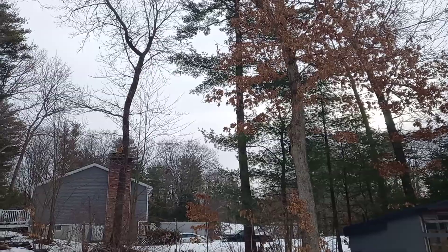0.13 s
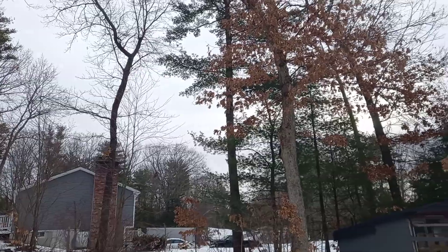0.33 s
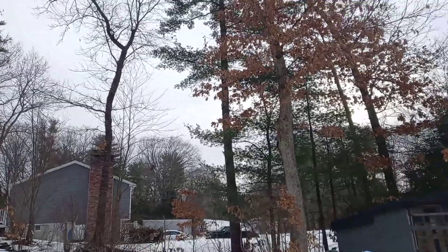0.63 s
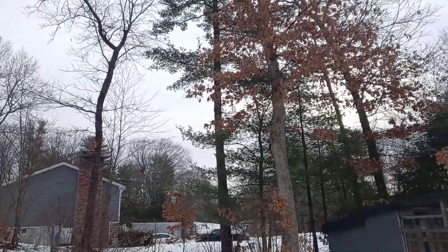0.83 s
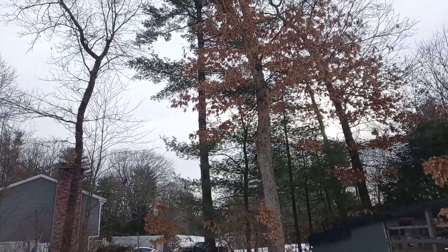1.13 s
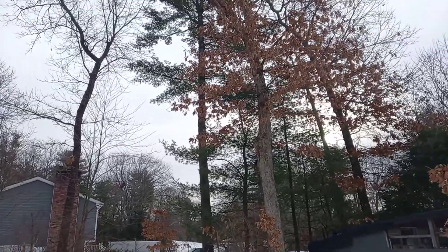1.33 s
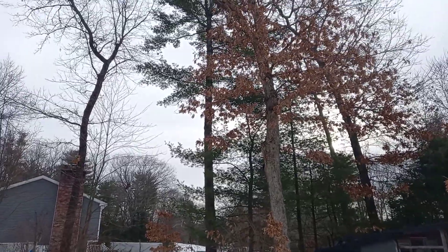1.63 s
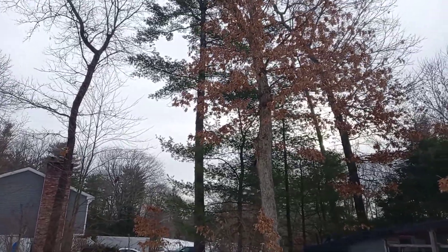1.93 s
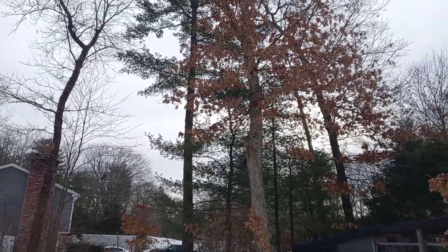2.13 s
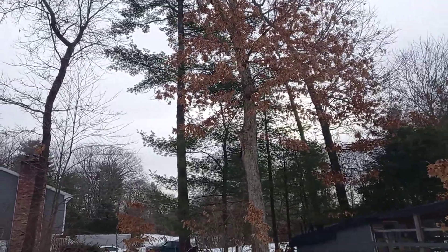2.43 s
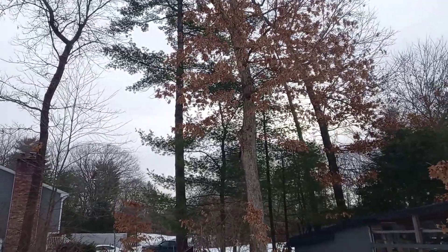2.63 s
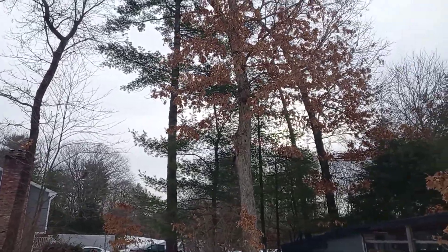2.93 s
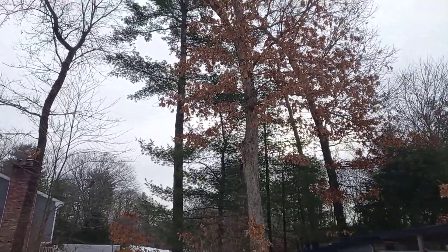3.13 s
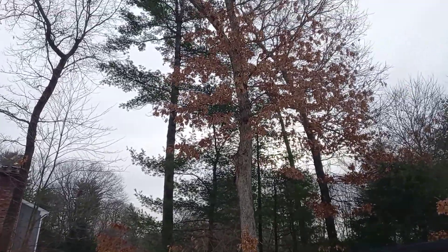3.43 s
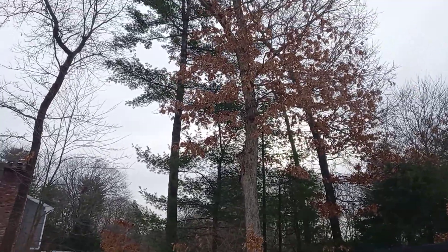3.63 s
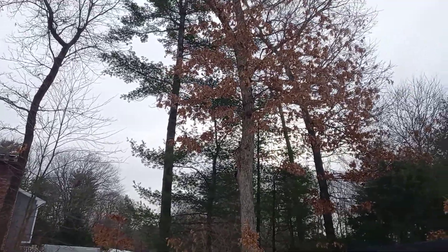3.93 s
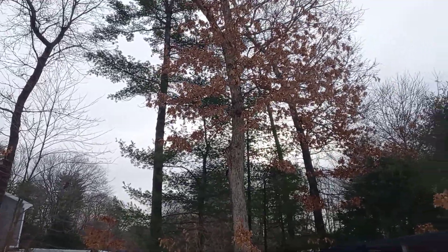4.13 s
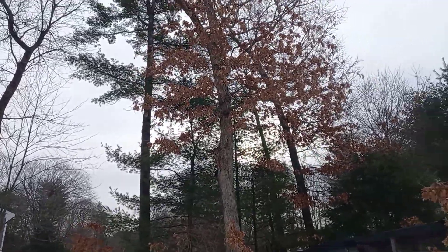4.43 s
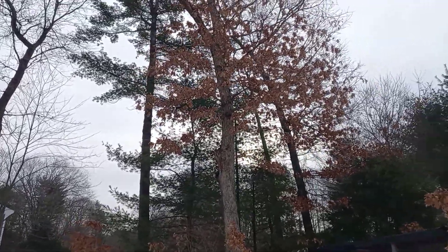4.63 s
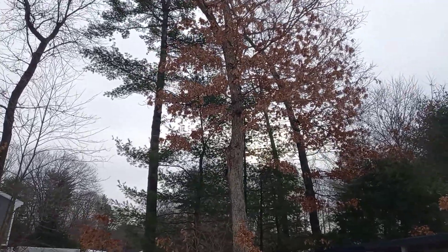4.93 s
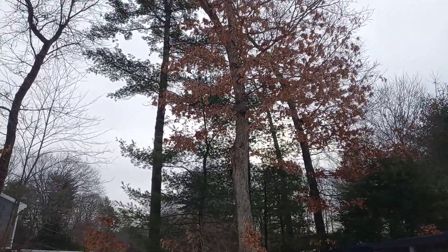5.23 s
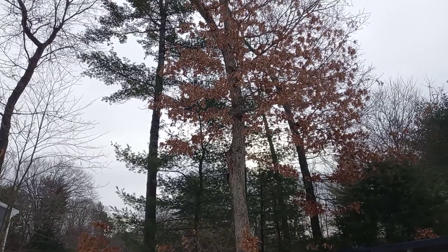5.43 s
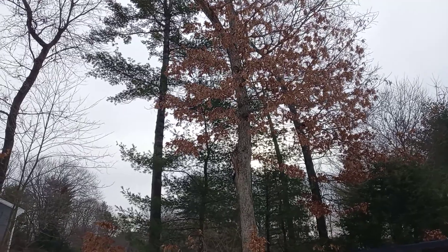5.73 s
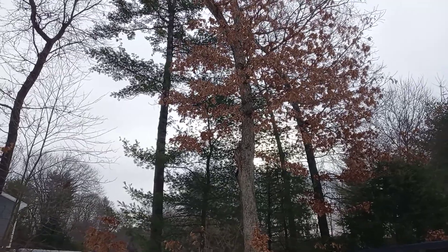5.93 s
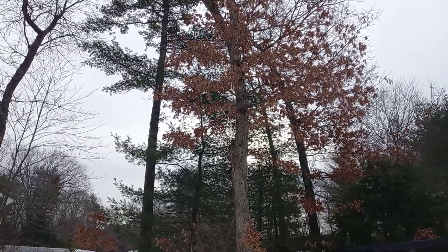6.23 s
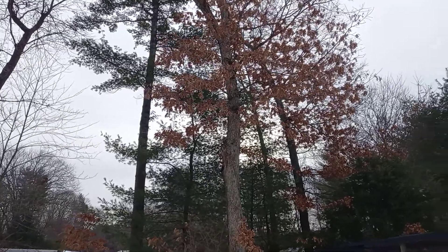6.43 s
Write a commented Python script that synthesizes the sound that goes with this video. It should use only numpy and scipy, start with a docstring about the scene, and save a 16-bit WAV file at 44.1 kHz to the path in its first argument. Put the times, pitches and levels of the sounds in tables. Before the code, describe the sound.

In a wooded yard, distant songbirds trade rising whistles and falling slurs over a hollow low drone that swells and sinks in gusts. A woodpecker gives a few sharp knocks on a trunk, pauses, then raps a longer, louder run of quick blows. Nearer whistles join toward the end with a slight echo. The sound is in stereo, with a soft hiss of open air underneath.

```python
"""A snowy yard between houses and trees, heard through a stereo pair of microphones.
A woodpecker raps on wood in two quick runs, about seven blows a second: the bill cracks, the trunk rings.
Songbirds trade rising whistles and falling slurs, far off at first, then nearer, echoing from the houses
and through the wood. Underneath, a hollow low drone swells and sinks in gusts, taking a distant rumble
and a faint hum with it; the open air hisses and dry oak leaves stir."""
import sys
import numpy as np
from scipy import signal
from scipy.fft import rfft, irfft
from scipy.io import wavfile

SR = 44100
rng = np.random.default_rng(int(sys.argv[2]) if len(sys.argv) > 2 else 0)


def int16_out(signal):
    """Quantize to a 16-bit WAV file."""
    q = np.round(np.clip(np.atleast_2d(signal).T, -1, 1) * 32767)
    wavfile.write(sys.argv[1], SR, q.astype(np.int16))


N = 290178
T = np.arange(N) / SR
GUST_MEAN_DB = -52

# Table levels are relative; pan_db is left minus right.
# spectra of the open air, dry leaves, distant rumble, drone and its upper edge: frequency_hz, level_db
HISS_SPECTRUM = [(200, 12), (700, 19), (1100, 16), (1700, 18), (2600, 10.5), (3400, 9.5), (5000, 2.5),
                 (6800, 1), (8000, -2), (9500, -3.5), (12000, 3.5), (16000, -19.5)]
LEAF_SPECTRUM = [(2500, -4), (5200, -14.5), (6700, -4), (7900, -11), (9400, -9.5), (11500, -21),
                 (16000, -20.5)]
RUMBLE_SPECTRUM = [(20, -28.5), (40, -8.5), (62, 4.5), (85, 4), (140, 1.5), (190, 4), (250, 7.5), (400, -9),
                   (800, -37.5)]
DRONE_SPECTRUM = [(150, -43.5), (220, -13.5), (290, -4.5), (350, 1.5), (420, 1.5), (470, -6), (525, -11),
                  (580, -23.5), (700, -31.5), (1000, -50), (2000, -66.5)]
EDGE_SPECTRUM = [(380, -31.5), (500, -1), (530, 1), (570, -7), (620, -7), (700, -14), (900, -28),
                 (1500, -50)]
# strength of the leaves' stir, the gusts and the drone's upper edge: time_s, level_db
LEAF_LEVELS = [(.3, -100), (.5, -81), (.62, -90), (.8, -80), (1.1, -81), (1.28, -84.5), (1.38, -73),
               (1.48, -90), (1.65, -78.5), (1.9, -100), (2.5, -105)]
GUST_LEVELS = [(0.11, -68), (0.49, -60), (0.52, -53), (0.58, -64), (0.78, -62), (0.97, -40.5), (1.05, -48),
               (1.19, -47), (1.46, -61.5), (1.57, -48.5), (1.69, -52), (1.75, -65), (1.78, -56),
               (2.06, -42.5), (2.13, -51.5), (2.16, -45.5), (2.25, -56), (2.67, -49), (2.76, -59.5),
               (2.97, -47), (3.03, -58), (3.33, -61), (3.37, -52), (3.44, -59.5), (3.48, -53), (3.88, -56),
               (4.02, -50), (4.25, -59), (4.29, -51.5), (4.78, -52), (4.96, -39.5), (5.05, -51.5),
               (5.08, -45), (5.14, -58), (5.19, -44.5), (5.24, -54), (5.28, -46), (5.5, -48), (5.53, -54),
               (5.82, -44), (5.98, -58), (6.04, -50), (6.13, -55), (6.45, -48), (6.51, -42), (6.58, -47)]
EDGE_LEVELS = [(0.11, -94), (0.49, -74.5), (0.76, -88), (0.96, -65), (1.08, -71.5), (4.25, -74),
               (4.51, -61), (4.69, -67.5), (4.96, -51.5), (5.14, -65.5), (5.34, -57.5), (6.33, -72.5),
               (6.47, -63), (6.58, -63)]
# tones of the hum: pitch_hz, level_db
HUM_TONES = [(104.2, -77), (209, -72)]
# centre of the drone at mean gust strength: time_s, pitch_hz
DRONE_CENTRE = [(.1, 356.4), (.85, 374.8), (1.15, 344), (2.0, 346.9), (2.55, 370.4), (2.95, 342.8),
                (3.6, 389.4), (4.6, 387.4), (4.95, 368.3), (5.6, 383), (6.58, 375)]

# pitch shapes of the bird notes, scaled by each note's pitch_ratio: share_of_note, pitch_hz
WHISTLE_SHAPE = [(0, 2760), (.33, 2780), (.45, 3055), (.65, 3161), (1, 3230)]
LOW_SLUR_SHAPE = [(0, 2500), (.35, 2230), (.6, 2007), (1, 1942)]
UPSLUR_SHAPE = [(0, 2550), (.35, 3476), (.65, 3980), (1, 4035)]
DOWNSLUR_SHAPE = [(0, 4130), (.2, 4030), (.7, 3180), (1, 3080)]
PEEP_SHAPE = [(0, 6260), (.5, 7350), (1, 6550)]
SWEEP_SHAPE = [(0, 4450), (.5, 5400), (1, 6440)]
BLIP_SHAPE = [(0, 682), (1, 702)]
RASP_SHAPE = [(0, 3630), (.4, 4006), (1, 3950)]
# high rising and falling notes, thin peeps, a clean upward sweep and a faint low blip:
# start_s, length_s, level_db, pan_db, pitch_ratio, buzz_amount
UPSLUR_NOTES = [(0.21, .1, -77.5, 5, 0.98, 0.32), (0.281, 0.08, -78.5, 6, 0.95, .6),
                (0.406, 0.084, -80.5, 3, 0.97, .45), (0.597, 0.19, -78.5, 6, 1, 0.3),
                (0.672, .14, -80.5, 7, 1.02, .4), (.865, .079, -81.5, 2.5, 1.12, 0.6),
                (1.288, 0.11, -79, 5, 1.02, 0.6), (1.534, 0.15, -75.5, 5, .99, 0.13),
                (1.888, 0.075, -80.5, 4, 0.88, 0.8)]
DOWNSLUR_NOTES = [(0.786, 0.021, -76, 0, .97, 0.13), (.94, .065, -74, 3, 0.86, .2),
                  (2.402, .097, -88, 12, 0.89, 0.35), (5.856, 0.02, -68, -0.5, 0.84, 0.2),
                  (6.229, .026, -58.5, 7.5, 1, 0.5)]
PEEP_NOTES = [(4.042, 0.058, -83, -15, 0.97, .3), (4.123, 0.059, -86, -17, 0.93, 1),
              (4.482, 0.022, -70, -4, .97, 0.7)]
SWEEP_NOTES = [(0.546, .058, -83.5, -7, 1, 0)]
BLIP_NOTES = [(3.135, .045, -71.5, 9, 1, 0.26)]
# rising whistles that lead the song, and low falling slurs between them:
# start_s, length_s, level_db, pan_db, pitch_ratio, buzz_amount, crescendo_db
WHISTLE_NOTES = [(0.67, 0.16, -69, 1, 1.005, 0.24, 19), (1.058, .19, -70, 1, 1.02, .4, 11),
                 (1.467, 0.15, -68, 3, 1.01, .45, 14.5), (1.925, 0.19, -68.5, 0.5, 1, .5, 11),
                 (2.47, .25, -91, 5, 1.03, .5, 8), (5.632, 0.17, -64, 15, 1, 0, 22.5),
                 (5.998, 0.19, -63, 11, 0.99, 0.18, 23), (6.39, 0.21, -59.5, 8.5, 0.99, 0.3, 15)]
LOW_SLUR_NOTES = [(0.514, 0.082, -82.5, -2, 1.01, .1, -2), (0.919, 0.065, -75, -7.5, 1.02, .1, 4),
                  (1.326, 0.088, -73, -8.5, .99, 0.02, 3), (1.807, 0.078, -69.5, -7, .98, .1, 11),
                  (2.394, .045, -76.5, -9, 0.9, 0.1, 4), (2.784, 0.02, -71.5, -4, .9, .1, 9),
                  (5.884, .07, -69.5, -8, 1.03, 0, -12), (6.265, .075, -66, -4.5, 1.005, 0.3, -15.5)]
# hoarse calls: start_s, length_s, level_db, pan_db, pitch_ratio, buzz_amount, crescendo_db, fall_hz
RASP_NOTES = [(2.325, 0.088, -74.5, 0, 1.07, .9, 1.5, 1100), (2.712, 0.15, -69, 5.5, 1.0, 0.73, 6, -200)]
# echoes of the birds off the houses, and of the blows off the walls: delay_s, left_db, right_db
HOUSE_ECHOES = [(.017, -18, -16), (.031, -16, -19)]
WALL_ECHOES = [(.0018, 3.5, -10.5), (.0043, 2.5, -8), (0.0167, 0.5, -6), (0.056, -24.5, -22)]

# blows of the bill, each with three rings of the struck spot: start_s, level_db, knock_db, pan_db,
# hardness_db, ring1_hz, ring2_hz, ring3_hz, ring1_db, ring2_db, ring3_db
BILL_BLOWS = [(2.1963, -83.5, 13.5, -8, 8, 1310, 1920, 3200, 12, 4, -9),
              (2.6913, -49, -11, 9.5, -17, 1200, 1750, 3520, 2, 2, 6),
              (2.8192, -44, -6, 8, -7.5, 1000, 1750, 3540, 2, 3.5, 8.5),
              (2.946, -35.5, -9.5, 5.5, -5, 1050, 1610, 2750, 4, 1.5, -3),
              (3.2187, -43.5, -10, 3, -11.5, 980, 1740, 2800, 4, 2, -5.5),
              (4.187, -81.5, 7, -12, 9.5, 1320, 1690, 2750, 2, 5, -14),
              (4.29, -51, -6, -3, -23, 1180, 2140, 3360, -3, -3.5, -4),
              (4.414, -47, -12.5, 0, -30, 1300, 2420, 2600, 6, 4, 0),
              (4.54, -47.5, -8, 1, -20, 1140, 1540, 2750, 8, -3, 2),
              (4.675, -51, -4, -3, -12, 1120, 1890, 2800, 9, 6, -6),
              (4.7897, -42, -11, 3, -38, 1360, 1800, 2800, -4, 0, -1),
              (4.921, -35.5, -9.5, 6.5, -10, 1130, 1920, 2800, 0, -7.5, -1),
              (5.043, -31, -9.5, 1.5, 0.5, 970, 2070, 2640, 5.5, -4.5, 0.5),
              (5.1705, -31.5, -8, 5, 0, 975, 2060, 2520, 9.5, 0.5, -1),
              (5.3001, -32, -9, 2, 0.5, 1000, 1910, 1460, 0.5, -4.5, -3.5),
              (5.424, -33, -4, 4.5, -4.5, 1150, 1900, 2320, 3.5, -7.5, -5),
              (5.5654, -33, -4.5, 5, -4, 1100, 2200, 2550, 9.5, 7, 6),
              (5.717, -29, -9, 5, 0.5, 1170, 2240, 3210, -6.5, -0.5, -1),
              (5.872, -36, -6, 9, -5.5, 1040, 2240, 2930, -6, -3.5, 0),
              (6.0291, -41.5, -16.5, 6.5, -1, 1120, 2060, 2900, -10, 3, 2),
              (6.195, -42.5, -9.5, 3.5, -7, 884, 2080, 3220, -2, -3, 11.5)]
# modes of the trunk: pitch_hz, level_db, t60_s
TRUNK_MODES = [(400, 1, 0.021), (577, 3.5, 0.0037), (645, 2.5, 0.0097), (1450, -10.5, 0.024),
               (2446, 5, 0.0073), (4500, 12.5, 0.0044)]
# three rings of the spot right under the bill: level_db, t60_s
SPOT_RINGS = [(-0.5, 0.0098), (3, 0.006), (-2, 0.008)]
# crack of the bill at the left and right microphone: frequency_hz, level_db
LEFT_CRACK_SPECTRUM = [(300, -5), (1400, -19.5), (2500, -4), (4000, -2.5), (5200, -6), (6500, 0.5),
                       (8000, 0.5), (9400, 5.5), (11000, -3), (13500, -1.5), (16000, -14)]
RIGHT_CRACK_SPECTRUM = [(300, 9), (1400, 6.5), (2500, -3), (4000, -10.5), (5200, 9), (6500, 7.5),
                        (7500, 13), (8800, -7), (11000, 6), (13500, 1.5), (16000, -13)]


def from_db(db):
    """Decibels to gain."""
    return 10 ** (np.asarray(db) / 20)


def stereo_gain(left_db, right_db):
    """A gain for each microphone."""
    return from_db([[left_db], [right_db]])


def unit_rms(x):
    """Scale to unit rms."""
    return x / np.sqrt(np.mean(x ** 2) + 1e-20)


def unit_energy(x):
    """Scale each channel to unit energy."""
    return x / np.sqrt(np.sum(x ** 2, axis=-1, keepdims=True) + 1e-20)


def in_time(rows):
    """A curve table's value at every sample."""
    return np.interp(T, *np.transpose(rows))


def add(track, start_s, sound):
    """Mix a sound into a track from a given time on."""
    i = max(round(start_s * SR), 0)
    piece = sound[..., :max(track.shape[-1] - i, 0)]
    track[..., i:i + piece.shape[-1]] += piece


def colour(x, spectrum, size=4096):
    """Minimum-phase filter of unit energy that follows a spectrum."""
    hz, db = np.transpose(spectrum)
    grid_hz = np.maximum(np.arange(size // 2 + 1) * SR / size, 1)
    gain = from_db(np.interp(np.log(grid_hz), np.log(hz), db))
    cepstrum = irfft(np.log(gain))
    cepstrum[1:size // 2] *= 2
    cepstrum[size // 2 + 1:] = 0
    response = unit_energy(irfft(np.exp(rfft(cepstrum))))
    return signal.oaconvolve(np.atleast_2d(x), response[None])[:, :N]


def stereo_noise(spectrum, alike):
    """Coloured noise with a given left-right correlation."""
    mid, side = rng.standard_normal((2, N))
    white = np.sqrt((1 + alike) / 2) * mid + np.sqrt((1 - alike) / 2) * side * [[1], [-1]]
    return colour(white, spectrum)


def drift(rate_hz):
    """Random wander of unit rms, mostly slower than the given rate."""
    lowpass = signal.butter(2, rate_hz, fs=SR, output="sos")
    return unit_rms(signal.sosfilt(lowpass, rng.standard_normal(N + SR))[SR:])


def at_mics(x, right_db=0.5, lag_s=0.000529):
    """Low sounds reach the left microphone first and the right one a little louder."""
    return np.vstack([x[0], from_db(right_db) * np.interp(T - lag_s, T, x[1])])


def woods(x, t60, tail_db, tail_t60):
    """Countless faint echoes from trunks and branches, with a long tail from deeper in the wood."""
    t = np.arange(SR) / SR
    fade = np.hypot(from_db(-60 * t / t60), from_db(tail_db - 60 * t / tail_t60))
    response = unit_energy(rng.standard_normal((2, SR)) * fade)
    return signal.oaconvolve(x * np.ones((2, 1)), response, axes=1)[:, :N]


def air_hiss():
    """Soft, steady hiss of open air all round the microphones."""
    return from_db(-79.5) * stereo_noise(HISS_SPECTRUM, alike=0.037)


def oak_leaves(flicker_db=2):
    """Dry leaves stir in the first two seconds with a flickering rustle."""
    return from_db(in_time(LEAF_LEVELS) + flicker_db * drift(40)) * stereo_noise(LEAF_SPECTRUM, alike=0)


def distant_rumble(gust_db, follows=0.41, waver_db=2.46):
    """A far-off rumble wavers and follows part of the gusts' swing."""
    level = from_db(-66.5 + follows * gust_db + waver_db * drift(4.4))
    return at_mics(level * stereo_noise(RUMBLE_SPECTRUM, alike=0.64))


def hum(gust_db, follows=0.861, waver_db=4.5):
    """Two faint tones an octave apart waver in level and phase, rising with the gusts."""
    tones = np.zeros(N)
    for hz, db in HUM_TONES:
        level = from_db(db + follows * gust_db + waver_db * drift(1.31))
        tones += np.sqrt(2) * level * np.sin(2 * np.pi * hz * T + 0.75 * drift(3.4))
    return at_mics([tones, tones])


def drone(gust_db, sag_hz_per_db=0.94, howl_width_hz=17):
    """A hollow rush with a narrow howl inside; as a gust swells, the howl takes over and both sag."""
    centre_hz = in_time(DRONE_CENTRE) - sag_hz_per_db * gust_db
    # the rush runs faster or slower to glide with the howl
    speed = (centre_hz / centre_hz.mean()) ** 1.1
    position = np.cumsum(speed / speed.mean())
    steady_rush = stereo_noise(DRONE_SPECTRUM, alike=.82)
    rush = np.array([np.interp(position, np.arange(N), side) for side in steady_rush])
    wander = drift(howl_width_hz) + 1j * drift(howl_width_hz)
    wander /= np.sqrt(np.abs(wander) + 1e-9)   # evens out the howl's level
    howl = unit_rms(np.real(wander * np.exp(2j * np.pi * np.cumsum(centre_hz) / SR)))
    body = from_db(-1 + 0.86 * gust_db) * rush + from_db(-3 + 1.28 * gust_db) * howl
    # the upper edge opens out in the later gusts
    edge = from_db(in_time(EDGE_LEVELS)) * stereo_noise(EDGE_SPECTRUM, alike=0.6)
    return at_mics(from_db(GUST_MEAN_DB) * body + edge, lag_s=0.00042)


def bird_note(unrest, shape, start_s, length_s, db, pitch_ratio, buzz, crescendo_db=4, fall_hz=0):
    """One whistled note glides along its shape and trembles; in buzzy notes the pitch flutters fast."""
    progress = np.linspace(0, 1, int(length_s * SR))
    samples = (np.arange(len(progress)) + int(start_s * SR)) % N
    flutter_hz, waver_hz, tremble_db = unrest[:, samples]
    glide_hz = pitch_ratio * np.interp(progress, *np.transpose(shape)) - fall_hz * (progress - .5)
    hz = glide_hz + buzz ** 2 * flutter_hz + waver_hz
    level = from_db(db + crescendo_db * (progress - .5) + tremble_db)
    return signal.windows.tukey(len(progress), .35) * level * np.sin(2 * np.pi * np.cumsum(hz) / SR)


def songbirds(near_from_s=5, house_delay_s=.056, open_perch_db=-7):
    """Notes reach the microphones directly, off the houses and scattered by the trees."""
    direct, scattered, off_house = np.zeros((3, 2, N))
    unrest = np.array([440 * drift(330), 55 * drift(70), 3.5 * drift(60)])   # flutter, waver, tremble
    # birds on an open perch send less sound through the trees and to the house
    song = [(WHISTLE_SHAPE, WHISTLE_NOTES, 0), (LOW_SLUR_SHAPE, LOW_SLUR_NOTES, 0),
            (UPSLUR_SHAPE, UPSLUR_NOTES, 0), (DOWNSLUR_SHAPE, DOWNSLUR_NOTES, 0),
            (PEEP_SHAPE, PEEP_NOTES, open_perch_db), (RASP_SHAPE, RASP_NOTES, open_perch_db),
            (SWEEP_SHAPE, SWEEP_NOTES, open_perch_db), (BLIP_SHAPE, BLIP_NOTES, open_perch_db)]
    for shape, notes, perch_db in song:
        for start_s, length_s, db, pan_db, *voice in notes:
            # far notes waver and scatter more; a house wall returns near ones almost at full strength
            unsteadiness, house_db, scatter_db = (1, -10, 6.5) if start_s < near_from_s else (.5, -1, -3.5)
            note = bird_note(unsteadiness * unrest, shape, start_s, length_s, db, *voice)
            note = note * stereo_gain(pan_db / 2, -pan_db / 2)
            add(direct, start_s, note)
            add(off_house, start_s + house_delay_s, note * from_db(perch_db + house_db))
            add(scattered, start_s, note * from_db(perch_db + scatter_db))
    heard = direct + off_house + woods(scattered, t60=0.42, tail_db=-9.5, tail_t60=1.9)
    for delay_s, left_db, right_db in HOUSE_ECHOES:
        add(heard, delay_s, direct * stereo_gain(left_db, right_db))
    return from_db(-3) * heard


def blow_in_yard(t, hardness_db, hold_s, t60, contact_s=0.0013, late_t60=0.52, scatter_db=10):
    """One blow at the microphones: the contact, wall echoes, then dense scatter from yard and trees."""
    contact = unit_energy(rng.standard_normal((2, len(t))) * np.exp(-t / contact_s))
    contact[:, 0] += from_db(-2)   # the first snap
    contact *= from_db(hardness_db)
    arrivals = contact.copy()
    for delay_s, left_db, right_db in WALL_ECHOES:
        add(arrivals, delay_s, contact * stereo_gain(left_db, right_db))
    near = from_db(-60 * np.maximum(t - hold_s, 0) / t60)
    far = stereo_gain(-13.5, -9.5) * from_db(-60 * t / late_t60)
    rise_s = 0.0003 * from_db(-hardness_db)   # softer blows build up more slowly
    envelope = (1 - np.exp(-t / rise_s)) * np.hypot(near, far)
    # early reflections come singly and unevenly, late ones merge
    jitter = np.interp(t, t[::20], rng.standard_normal(len(t[::20])))
    uneven = from_db(4 * np.exp(-t / .05) * jitter)
    scatter = unit_energy(rng.standard_normal((2, len(t))) * uneven * envelope)
    return arrivals + from_db(scatter_db) * scatter


def wood_ring(t, spot_hz, struck_db):
    """The trunk's modes ring briefly, with three more whose pitch depends on the spot struck."""
    hz, mode_db, t60 = np.array(TRUNK_MODES).T[:, :, None]
    modes = unit_energy(np.sin(2 * np.pi * hz * t) * from_db(-60 * t / t60))
    strengths = rng.choice([-1, 1], hz.shape) * from_db(mode_db + 1.8 * rng.standard_normal(hz.shape))
    trunk = from_db(2) * unit_energy(np.sum(modes * strengths, axis=0))
    spot_db, spot_t60 = np.array(SPOT_RINGS).T[:, :, None]
    rings = unit_energy(np.sin(2 * np.pi * np.outer(spot_hz, t)) * from_db(-60 * t / spot_t60))
    spot = np.sum(from_db(spot_db + struck_db[:, None]) * rings, axis=0)
    return unit_energy(trunk + spot)


def woodpecker():
    """Each blow of the bill gives a bright crack and a hollow knock that carries into the wood."""
    t = np.arange(SR // 2) / SR
    cracks, knocks = np.zeros((2, 2, N))
    for start_s, db, knock_db, pan_db, hardness_db, *struck in BILL_BLOWS:
        # the treble dies sooner in the yard than the knock
        crack = from_db(db) * blow_in_yard(t, hardness_db, hold_s=0.014, t60=0.18)
        knock = from_db(db + knock_db) * blow_in_yard(t, hardness_db, hold_s=0.023, t60=0.19)
        ring = wood_ring(t, *np.reshape(struck, (2, 3)))
        # the bill never meets the same spot twice, so every crack has its own tint
        tint = np.column_stack([np.linspace(2000, 16000, 20), rng.normal(0, 2, 20)])
        add(cracks, start_s, colour(crack, tint) * stereo_gain(pan_db / 2, -pan_db / 2))
        add(knocks, start_s, signal.fftconvolve(knock, ring[None]))
    bright = np.vstack([colour(cracks[0], LEFT_CRACK_SPECTRUM), colour(cracks[1], RIGHT_CRACK_SPECTRUM)])
    # long waves reach both microphones much alike
    hollow = at_mics(.8 * knocks + .45 * knocks[::-1], right_db=3)
    far = woods(knocks[0], t60=0.27, tail_db=-24.5, tail_t60=3.2)
    return from_db(7) * bright + from_db(11.5) * hollow + from_db(1.5) * far


def scene():
    """The yard from where the microphones stand; the same gusts drive drone, rumble and hum."""
    gust_db = in_time(GUST_LEVELS) - GUST_MEAN_DB
    birds = woodpecker() + songbirds()
    return birds + drone(gust_db) + distant_rumble(gust_db) + hum(gust_db) + air_hiss() + oak_leaves()


def record(dry, low_cut_hz=31, high_cut_hz=16500):
    """The sound sets in after a tenth of a second; the microphones lose the deepest bass and the top."""
    opening = np.clip((T - .095) / .015, 0, 1)
    low_cut = signal.butter(2, low_cut_hz, "high", fs=SR, output="sos")
    high_cut = signal.ellip(10, .1, 70, high_cut_hz, fs=SR, output="sos")
    return signal.sosfilt(high_cut, signal.sosfilt(low_cut, dry * opening))


dry = scene()
out = record(dry)
int16_out(out)
```